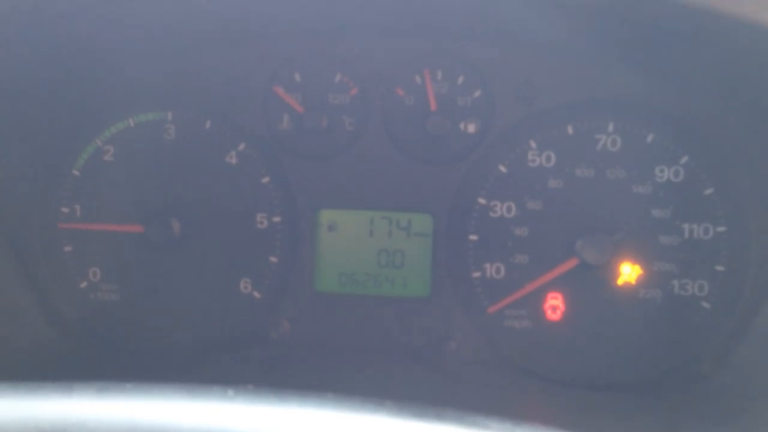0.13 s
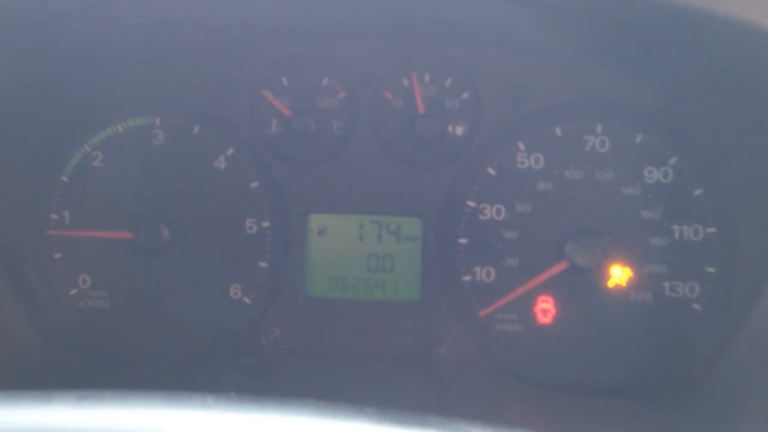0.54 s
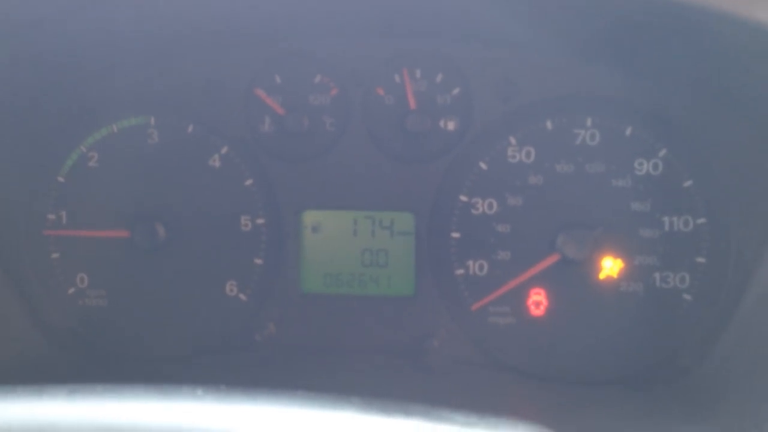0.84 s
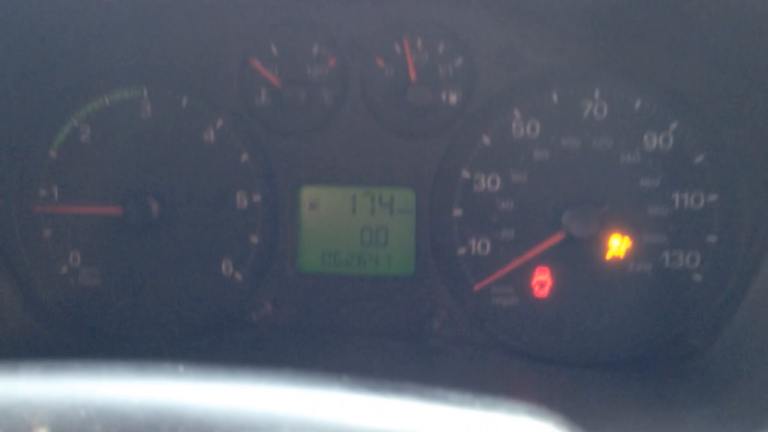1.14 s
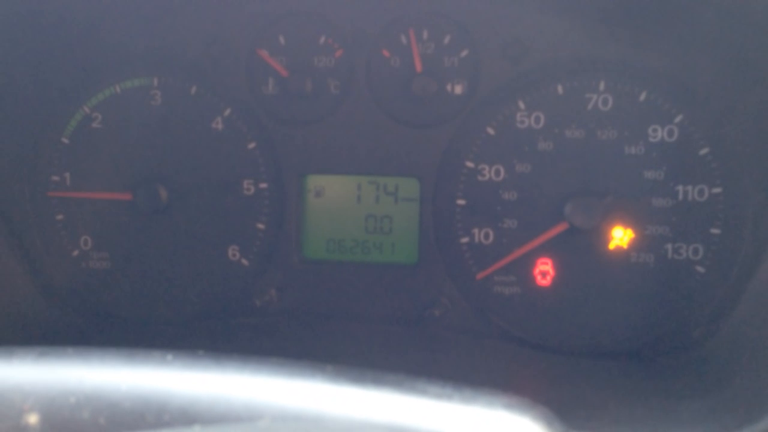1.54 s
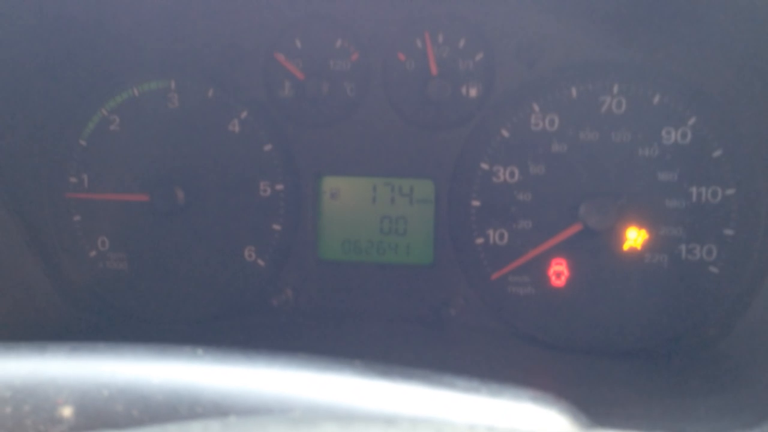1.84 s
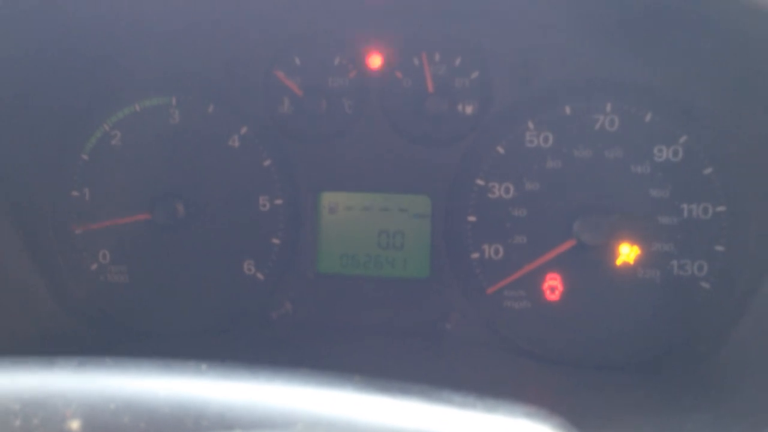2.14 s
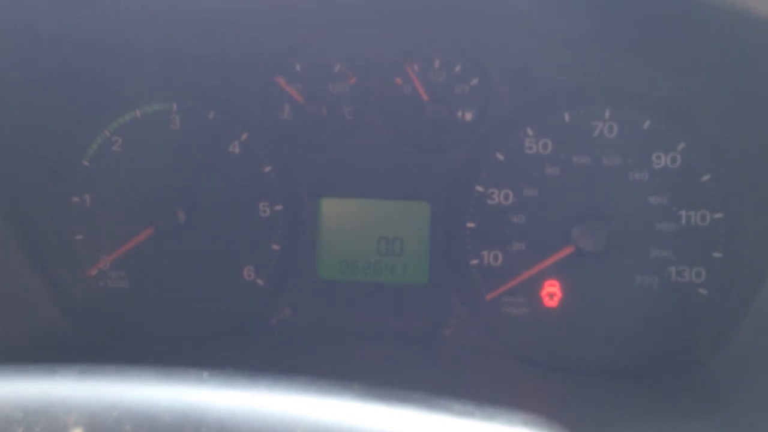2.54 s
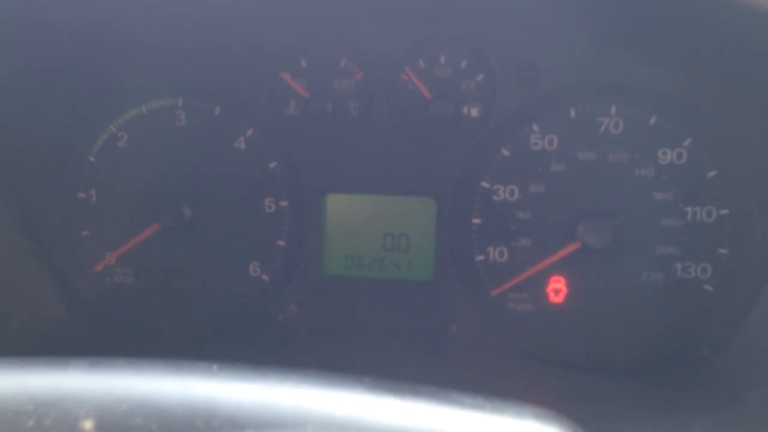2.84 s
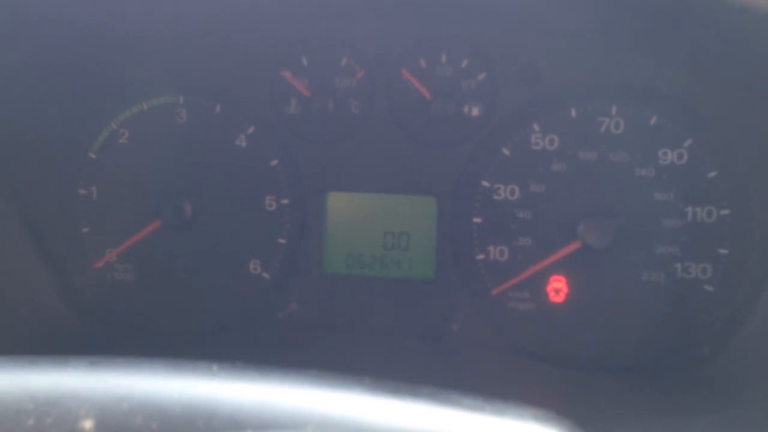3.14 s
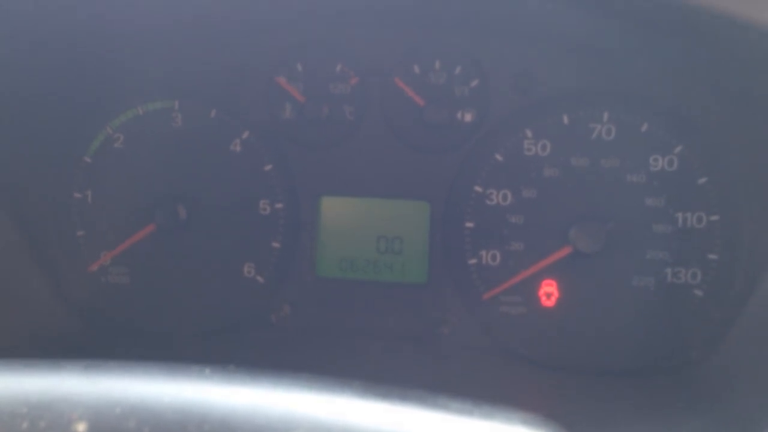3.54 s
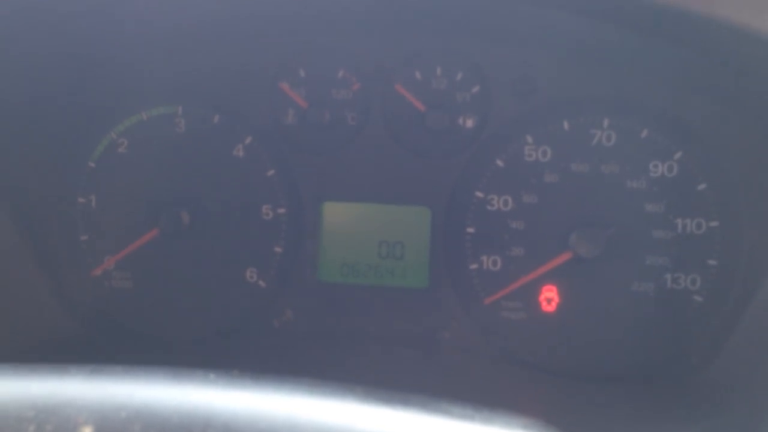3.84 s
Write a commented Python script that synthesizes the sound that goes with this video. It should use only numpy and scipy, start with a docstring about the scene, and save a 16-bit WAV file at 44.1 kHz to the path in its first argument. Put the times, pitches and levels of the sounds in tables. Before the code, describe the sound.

Clattering diesel idle inside a van, cut by sharp key clicks, shaking down into near silence.

```python
"""A four-cylinder diesel idles with a clattering knock, heard from the driver's seat of a van.
The ignition key clicks off; the engine turns through its last compressions and shudders to rest.
In the quiet cab a hand rustles and knocks against plastic trim.
The boom is a stack of cosines; knocks and clicks ring damped modes or shape bursts of coloured noise."""
import sys
import numpy as np
from scipy import signal
from scipy.fft import rfft, irfft
from scipy.io import wavfile

SR = 44100
rng = np.random.default_rng(int(sys.argv[2]) if len(sys.argv) > 2 else 0)


def wav_record(signal):
    """Record a signal, one row per channel, as 16-bit PCM in the file named by sys.argv[1]."""
    frames = np.transpose(np.atleast_2d(signal))
    bounded = np.clip(frames, -1, 1)
    # unit amplitude maps onto the largest positive 16-bit level
    quanta = np.round(bounded * 32767).astype(np.int16)
    wavfile.write(sys.argv[1], SR, quanta)


N = 176400
T = np.arange(N) / SR  # time [s]

CYCLE_S = .14998  # two crank turns, four firings
KEY_OFF_S = 2.105  # the fuel is cut and the running sounds start to fade
CLATTER_FADE_DB_PER_S = 75
CLICK_ATTACK_S = 0.0012
CAB_TAIL_DB, CAB_DECAY_S = -10.5, 0.017  # short answer of the cab, relative to the direct blow

# cab panels: (frequency [Hz], relative level [dB], t60 [s])
PANEL_MODES = [(177, 1.5, 0.17), (207, -6, 0.2), (245, -2, 0.2), (270, 0, 0.077), (335, -9, 0.087),
               (360.3, -2.5, 0.21)]
# tone of the engine's mechanical clatter: (frequency [Hz], relative level per hertz [dB])
CLATTER_SPECTRUM = [(150, -9.5), (350, 1), (550, -2), (900, 0), (1400, -1.5), (1900, -3.5), (2400, -5),
                    (2900, -10), (4500, -13), (6000, -30.5), (9000, -45), (16000, -57)]
# tone of the steering column: (frequency [Hz], relative level per hertz [dB])
COLUMN_SPECTRUM = [(120, -12), (280, -8.5), (370, -1), (600, -0.5), (800, -7), (1100, -20), (1450, -16),
                   (2000, -27.5), (4000, -41), (12000, -64)]


def from_db(db):
    """Decibels to gain."""
    return 10 ** (np.asarray(db) / 20)


def in_time(rows):
    """Each column of a curve, sample by sample."""
    s, *columns = np.transpose(rows)
    return [np.interp(T, s, c) for c in columns]


def colour(x, spectrum):
    """Minimum-phase filter with the given spectrum; white noise keeps its power."""
    size = 2 * N
    hz, db = np.transpose(spectrum)
    bin_hz = np.arange(N + 1) * SR / size
    gain = from_db(np.interp(np.log(bin_hz + 1), np.log(hz), db))
    cepstrum = irfft(np.log(gain / np.sqrt(np.mean(gain ** 2))))
    # folding the cepstrum forward in time makes the filter causal
    cepstrum[1:N] *= 2
    cepstrum[N + 1:] = 0
    return irfft(rfft(x, size) * np.exp(rfft(cepstrum)))[:N]


def noise(spectrum, envelope):
    """White noise under an envelope, heard through a body's spectrum."""
    return colour(envelope * rng.standard_normal(N), spectrum)


def drift(rate):
    """Random wander in straight lines between points of spread 1, rate points a second."""
    return np.interp(T * rate, np.arange(1000), rng.standard_normal(1000))


def clicks(times, db):
    """A train of single impulses."""
    out = np.zeros(N)
    inside = (times >= 0) & (times < T[-1])
    np.add.at(out, (times[inside] * SR).astype(int), from_db(db)[inside])
    return out


def bursts(times, db, attack_s, decay_s):
    """Envelope of blows that rise, die away and add in power."""
    power = np.zeros(N)
    for s, level, decay in zip(times, db, decay_s * np.ones(len(times))):
        start = int(np.clip(s * SR, 0, N))
        age = T[:min(N - start, int(10 * decay * SR))]
        blow = from_db(level) * (1 - np.exp(-age / attack_s)) * np.exp(-age / decay)
        power[start:start + len(age)] += blow ** 2
    return np.sqrt(power)


def ring(x, modes):
    """Damped resonances; a unit click rings each at its own level."""
    out = 0
    for hz, db, t60 in modes:
        r = from_db(-60 / (t60 * SR))  # decay per sample
        w = 2 * np.pi * hz / SR
        # the tiny offset keeps the filter clear of slow denormal numbers
        mode = signal.lfilter([0, np.sin(w)], [1, -2 * r * np.cos(w), r * r], x + 1e-18)
        out = out + from_db(db) * mode
    return out


def struck(times, db, decay_s, spectrum, tail_db):
    """Quickly damped noise blows, each with the cab's short tail."""
    direct = bursts(times, db, CLICK_ATTACK_S, decay_s)
    tail = bursts(times, db + tail_db, decay_s.mean(), CAB_DECAY_S)
    return noise(spectrum, np.hypot(direct, tail))


def shroud(times, db, contact_s):
    """Blows ring the column's plastic shroud; a longer contact sounds duller."""
    # shroud resonances: (frequency [Hz], relative level [dB], t60 [s])
    shroud_modes = [(341, -4.5, 0.086), (412, 4.5, 0.075), (588, 8.5, 0.029), (643, -3, 0.11),
                    (758, -6.5, 0.099), (920, 2, 0.044), (1460, -6, 0.044)]
    push = np.zeros(N)
    for s, level, length in zip(times, db, contact_s * np.ones(len(times))):
        pulse = np.sin(np.pi * np.clip(T[:500] / length, 0, 1)) ** 2
        start = int(s * SR)
        push[start:start + len(pulse)] += from_db(level) * pulse / pulse.sum()
    # neighbouring modes answer with opposite sign
    return sum((-1) ** k * ring(push, [mode]) for k, mode in enumerate(shroud_modes))


def every_cycle(rows):
    """Repeats a table of contacts each engine cycle, a little uneven in time and strength."""
    jitter_s, uneven_db = .0003, 0.9
    cycles = range(int(T[-1] / CYCLE_S))
    rows = np.array([(k * CYCLE_S + s, a, b) for k in cycles for s, a, b in rows])
    return (rows + rng.standard_normal(rows.shape) * [jitter_s, uneven_db, uneven_db]).T


def running(fade_db_per_s):
    """Full level until the fuel is cut, then a fade."""
    return from_db(-fade_db_per_s * np.maximum(T - KEY_OFF_S, 0))


def boom():
    """The firing rate and its multiples drone in the cab, over a low rumble."""
    # drone partials: (multiple of the firing rate, RMS level [dB])
    orders = [(1, -45.5), (2, -43.5), (3, -37.5), (4, -43), (6, -53.5), (9, -56.5)]
    # low rumble: (frequency [Hz], relative level per hertz [dB])
    rumble_spectrum = [(15, 6), (30, -26.5), (48, -15.5), (80, 7.5), (130, -3.5), (230, 0), (330, -2),
                       (600, -24), (2000, -43.5)]
    cab_order = 3  # the multiple on which the cab resonates
    spread_rad = 1.4  # the cab delays the multiples on either side of it
    lag_s, waver_db, rumble_db, fade_db_per_s = 0.00948, 0.85, -44.5, 107
    firing_phase = 2 * np.pi * (T - lag_s) / (CYCLE_S / 4)
    drone = np.zeros(N)
    for order, db in orders:
        level = np.sqrt(2) * from_db(db + waver_db * drift(12.45))
        drone += level * np.cos(order * firing_phase - spread_rad * (order - cab_order) ** 2)
    return (drone + noise(rumble_spectrum, from_db(rumble_db))) * running(fade_db_per_s)


def firing_knock():
    """Each firing thumps the cab panels a moment after its harder knock rings out."""
    # firings in one cycle: (time into the cycle [s], relative thump [dB], relative knock [dB])
    firings = [(.0005, -2.5, 0.5), (.0375, -2.5, -4), (.0755, -1.5, 4.5), (.112, 1.5, -7)]
    # ring of the knock: (frequency [Hz], relative level [dB], t60 [s])
    knock_modes = [(635, 0, .07), (765, -7, .07), (930, -8, .07), (1065, -9, .07), (1200, -7, .09),
                   (1385, -7, .06)]
    thump_db, thump_lag_s, knock_db = -46.5, 0.00503, -42.5
    s, thump_offset_db, knock_offset_db = every_cycle(firings)
    thump = ring(clicks(s + thump_lag_s, thump_offset_db + thump_db), PANEL_MODES)
    knock = ring(clicks(s, knock_offset_db + knock_db), knock_modes)
    return (thump + knock) * running(CLATTER_FADE_DB_PER_S)


def contact_clatter():
    """Injector and valve contacts burst as noise and ring the engine covers."""
    # contacts in one cycle: (time into the cycle [s], relative clatter [dB], relative ring [dB])
    contacts = [(.001, 1, 3), (.008, 0, 3), (.017, 1, 0), (.028, -2, 1), (.041, 0, 1), (.047, -2, -7),
                (.059, -4, -9), (.076, -2, -2), (.083, 2, 2), (.092, 0, -6), (.102, 0, -6), (.112, -2, -3),
                (.122, -1, -4), (.132, -5, -9)]
    # ringing engine covers: (frequency [Hz], relative level [dB], t60 [s])
    cover_modes = [(1424, -10.5, 0.15), (1674, -2, 0.15), (1709, 1.5, 0.097), (2133, -5, 0.059),
                   (2300, -5, 0.027), (3113, -11.5, 0.056)]
    clatter_db, decay_s = -42, 0.015
    ring_db, ring_fade_db_per_s = -48.5, 170  # on top of the common clatter fade
    s, clatter_offset_db, ring_offset_db = every_cycle(contacts)
    envelope = bursts(s, clatter_offset_db + clatter_db, CLICK_ATTACK_S, decay_s)
    rattle = noise(CLATTER_SPECTRUM, envelope)
    blows = clicks(s, ring_offset_db + ring_db) * running(ring_fade_db_per_s)
    return (rattle + ring(blows, cover_modes)) * running(CLATTER_FADE_DB_PER_S)


def engine_hiss():
    """Coloured noise swells and sinks within each engine cycle."""
    # tone of the hiss: (frequency [Hz], relative level per hertz [dB])
    hiss_spectrum = [(800, -17.5), (2200, 7), (3000, 0.5), (4400, 0), (5300, -5), (6500, -8.5),
                     (8000, -18.5), (11000, -24.5), (16000, -33)]
    # swell over one cycle: (time into the cycle [s], relative level [dB])
    hiss_swell = [(.0, 3.5), (.014, -2.5), (.033, 2.5), (.05, 4), (.075, 4.5), (.1, 5), (.122, -2.5),
                  (.142, -6.5)]
    hiss_db = -52
    swell_db = np.interp(T, *np.transpose(hiss_swell), period=CYCLE_S)
    hiss = noise(hiss_spectrum, from_db(hiss_db + swell_db + 0.5 * drift(200)))
    return hiss * running(CLATTER_FADE_DB_PER_S)


def steady_hiss():
    """A faint hiss of constant level lies under everything."""
    # tone of the hiss: (frequency [Hz], relative level per hertz [dB])
    floor_spectrum = [(20, 14), (200, 14), (500, 8.5), (1000, -6), (3000, -1.5), (7000, -2), (15000, -4.5)]
    return noise(floor_spectrum, from_db(-62))


def ignition_key():
    """The lock snaps through its detents; barrel and steering column answer."""
    # clicks: (time [s], snap [dB], barrel [dB], column [dB], decay [s])
    key_clicks = [(1.84, -51, -42, -63, 0.0047), (2.014, -49, -40, -55, 0.014),
                  (2.0243, -18, -34, -44, 0.0061), (2.0296, -47, -29.5, -25, 0.0077),
                  (2.098, -45, -32, -35, 0.007), (2.141, -58, -50, -52, 0.031),
                  (2.175, -36, -29, -61, 0.0068), (2.185, -45, -22, -28, 0.0025),
                  (2.188, -45, -20.5, -39.5, 0.0046)]
    # bright snap: (frequency [Hz], relative level per hertz [dB])
    snap_spectrum = [(500, -20), (2500, -0.5), (4500, 2.5), (6000, -6), (7600, -3), (9200, -10),
                     (11000, 1.5), (13300, -1), (15500, -11)]
    # lock barrel: (frequency [Hz], relative level per hertz [dB])
    barrel_spectrum = [(300, -14), (1200, -6), (2400, -4), (3100, 4.5), (3700, -7.5), (4500, -2),
                       (6400, -12), (7600, -5.5), (8600, -14), (9600, -25), (16000, -31)]
    # metal of the lock: (frequency [Hz], relative level [dB], t60 [s])
    lock_modes = [(2620, -21, 0.06), (2850, -10, 0.053), (3100, -2, 0.063), (4260, -4, 0.048),
                  (5490, -4, .04), (7000, -12, .04), (7600, 4, 0.026)]
    snap_tail_db, lock_db, shroud_db, contact_s = -25, -13.5, -11.5, 0.00049
    s, snap_db, barrel_db, column_db, decay_s = np.transpose(key_clicks)
    snap = struck(s, snap_db, decay_s, snap_spectrum, snap_tail_db)
    barrel = struck(s, barrel_db, decay_s, barrel_spectrum, CAB_TAIL_DB)
    column = struck(s, column_db, decay_s, COLUMN_SPECTRUM, CAB_TAIL_DB)
    metal = ring(clicks(s, barrel_db + lock_db), lock_modes)
    plastic = shroud(s, column_db + shroud_db, contact_s)
    return snap + barrel + column + metal + plastic


def rocking():
    """The engine rocks on its mounts: low sway, panel shudder, loose rattle and single jolts."""
    # rocking: (time [s], sway [dB], panel shudder [dB], rattle [dB])
    rocking_levels = [(2.03, -77, -69, -67), (2.15, -35.5, -46, -50), (2.36, -39.5, -45, -71),
                      (2.46, -41.5, -48.5, -64), (2.55, -54, -45.5, -67), (2.63, -48, -42.5, -61.5),
                      (2.74, -39, -50.5, -64), (2.83, -48, -54.5, -68.5), (2.96, -52.5, -57.5, -72),
                      (3.07, -52.5, -56.5, -90), (3.2, -59, -63, -90), (3.35, -60.5, -63.5, -84),
                      (4, -64.5, -66.5, -70)]
    # low sway: (frequency [Hz], relative level per hertz [dB])
    sway_spectrum = [(12, -16), (28, -13), (44, -4.5), (54, 2.5), (75, -14), (110, -18), (250, -52),
                     (600, -80)]
    # panel shudder: (frequency [Hz], relative level per hertz [dB])
    shudder_spectrum = [(50, -23), (85, 2), (115, 1), (170, 2), (250, -3), (340, -16.5), (500, -24),
                        (1000, -29), (3000, -69)]
    # jolts of the mounts: (time [s], level [dB])
    mount_jolts = [(2.273, -37), (2.345, -35), (2.599, -31.5), (2.784, -38), (3.29, -50), (3.807, -58)]
    # ring of the mounts: (frequency [Hz], relative level [dB], t60 [s])
    mount_modes = [(44.3, -10, 0.12), (79, 7.5, 0.07), (126, -25, .05)]
    # judders of the cab's panels: (time [s], level [dB])
    panel_judders = [(2.365, -50), (2.402, -47), (2.44, -50), (2.59, -50), (2.642, -45.5), (2.725, -54.5),
                     (2.925, -58)]
    sway, shudder, rattle = from_db(in_time(rocking_levels))
    jolts = ring(clicks(*np.transpose(mount_jolts)), mount_modes)
    judders = ring(clicks(*np.transpose(panel_judders)), PANEL_MODES)
    swaying = noise(sway_spectrum, sway) + noise(shudder_spectrum, shudder)
    return jolts + judders + swaying + noise(CLATTER_SPECTRUM, rattle)


def sinking_hum():
    """A sine hum sinks with the crank and dies away."""
    # hum: (time [s], frequency [Hz], level [dB])
    hum_curve = [(2.06, 241.7, -65), (2.11, 227, -34.5), (2.17, 217, -38), (2.26, 220.5, -49),
                 (2.36, 203, -62), (2.45, 191, -92)]
    hz, hum_db = in_time(hum_curve)
    started = T > hum_curve[0][0]
    return from_db(hum_db) * np.sin(2 * np.pi * np.cumsum(hz) / SR) * started


def last_compressions():
    """The last compressions puff as soft-edged bursts of clatter noise."""
    # strokes: (time [s], level [dB])
    strokes = [(2.224, -43.5), (2.299, -40.5), (2.378, -45.5), (2.405, -52), (2.472, -45), (2.515, -54)]
    attack_s, decay_s = 0.0053, 0.035
    return noise(CLATTER_SPECTRUM, bursts(*np.transpose(strokes), attack_s, decay_s))


def hand():
    """Dull knocks on the column's plastic trim amid a soft rustle."""
    # knocks: (time [s], thud [dB], tick [dB], decay [s], contact [s])
    trim_knocks = [(3.034, -66, -55, .005, .001), (3.502, -46, -42.5, 0.0073, 0.00067),
                   (3.527, -33, -44.5, 0.011, 0.0022), (3.5309, -27, -53, 0.0035, 0.0021),
                   (3.545, -40, -59, 0.014, .0022), (3.566, -40, -52, .011, 0.0023),
                   (3.6682, -34, -53, 0.0034, 0.00064), (3.6719, -31.5, -55, 0.011, 0.00087)]
    # light tick: (frequency [Hz], relative level per hertz [dB])
    tick_spectrum = [(200, -12), (700, -2), (1500, 0.5), (3000, -1.5), (5000, -11), (8000, -22),
                     (16000, -28)]
    # handling: (time [s], level [dB])
    handling = [(3.18, -75), (3.26, -60.5), (3.36, -64.5), (3.47, -67.5), (3.58, -62), (3.65, -71),
                (3.73, -64.5), (3.79, -75), (3.88, -60.5), (4, -75)]
    # rustle: (frequency [Hz], relative level per hertz [dB])
    rustle_spectrum = [(150, -3), (400, -8), (800, 4), (1200, 1.5), (2000, -5), (3500, -7), (6000, -20),
                       (14000, -30)]
    shroud_db, rough_db = -6, -5
    s, thud_db, tick_db, decay_s, contact_s = np.transpose(trim_knocks)
    rustle_db, = in_time(handling)
    thuds = shroud(s, thud_db + shroud_db, contact_s)
    rough = struck(s, thud_db + rough_db, decay_s, COLUMN_SPECTRUM, CAB_TAIL_DB)
    ticks = struck(s, tick_db, decay_s, tick_spectrum, CAB_TAIL_DB)
    return thuds + rough + ticks + noise(rustle_spectrum, from_db(rustle_db))


def scene():
    """Engine, key and hand over a faint steady hiss, in one channel."""
    engine = boom() + firing_knock() + contact_clatter() + engine_hiss()
    background = steady_hiss()
    key = ignition_key()
    run_down = rocking() + sinking_hum() + last_compressions()
    return (engine + background + key + run_down + hand())[None]


def record(dry):
    """A steep elliptic low-pass cuts the top."""
    cutoff_hz = 15200
    # order 12, 0.1 dB passband ripple, 80 dB stopband
    low_pass = signal.ellip(12, .1, 80, cutoff_hz, fs=SR, output="sos")
    return signal.sosfilt(low_pass, dry)


dry = scene()
out = record(dry)
wav_record(out)
```